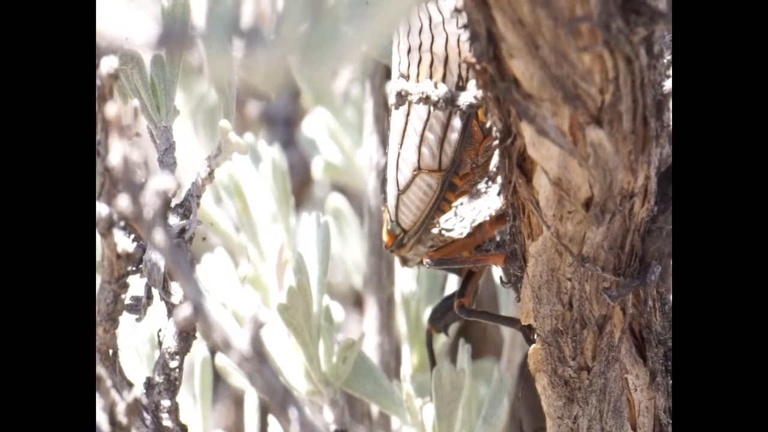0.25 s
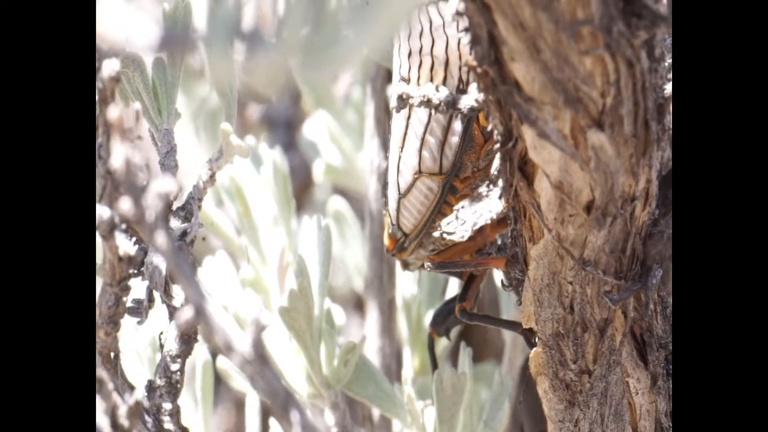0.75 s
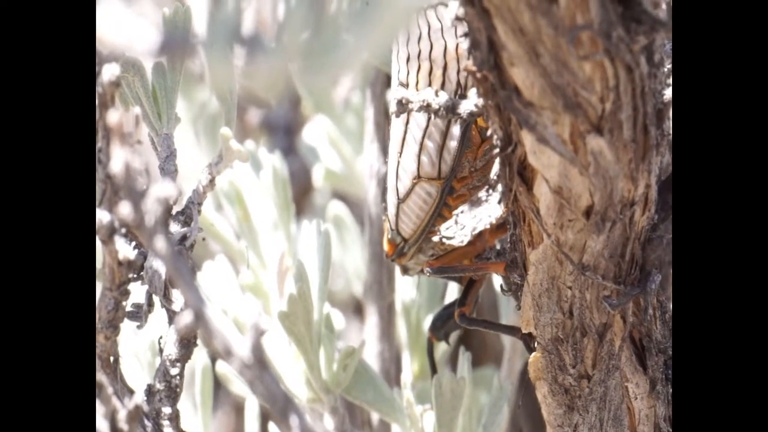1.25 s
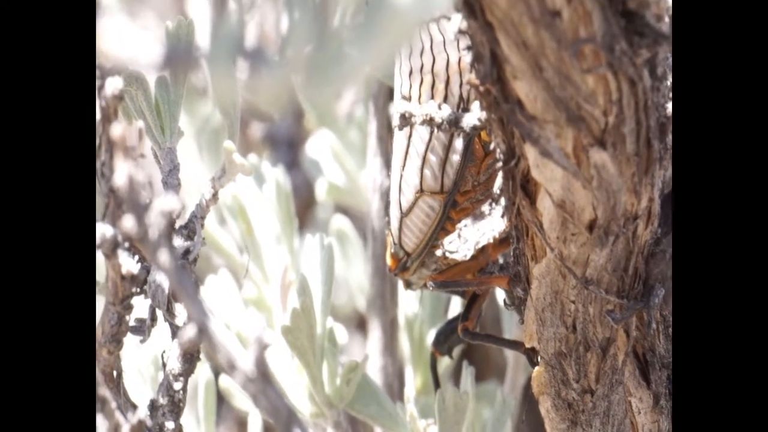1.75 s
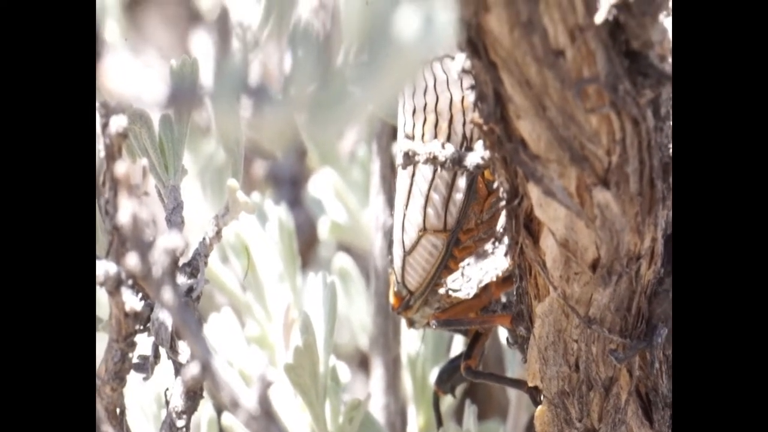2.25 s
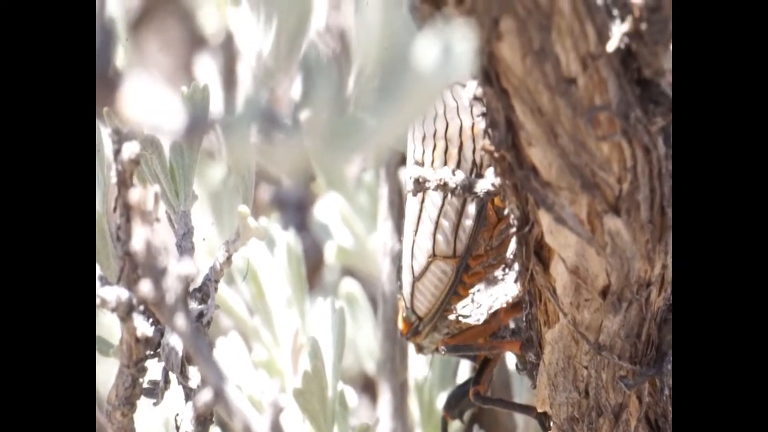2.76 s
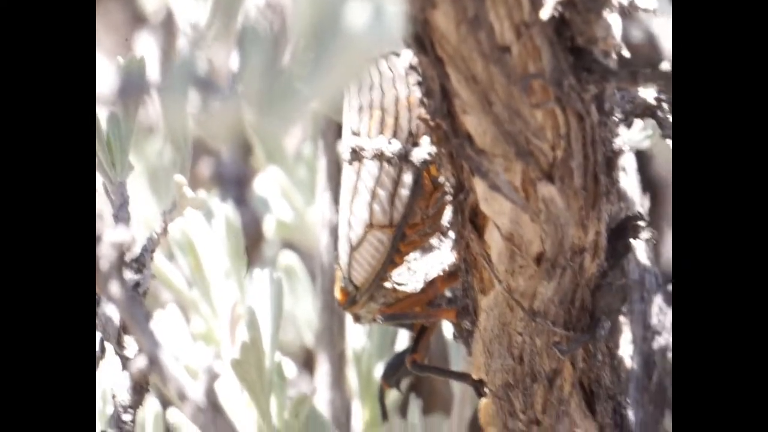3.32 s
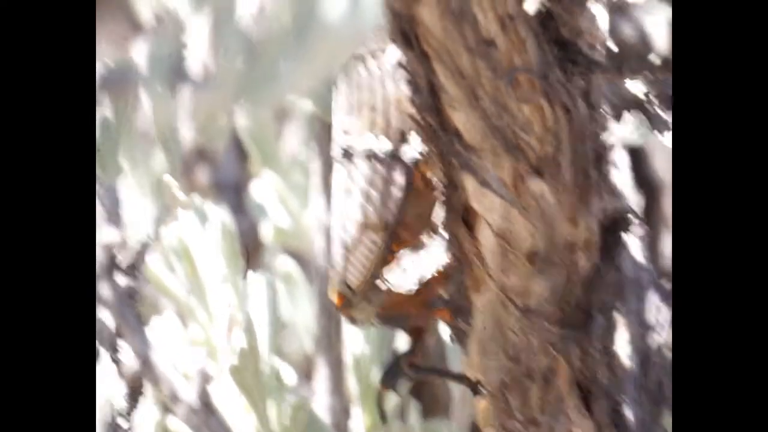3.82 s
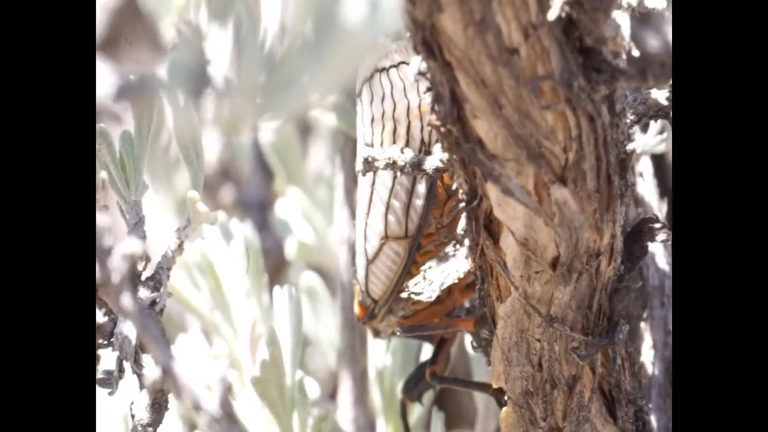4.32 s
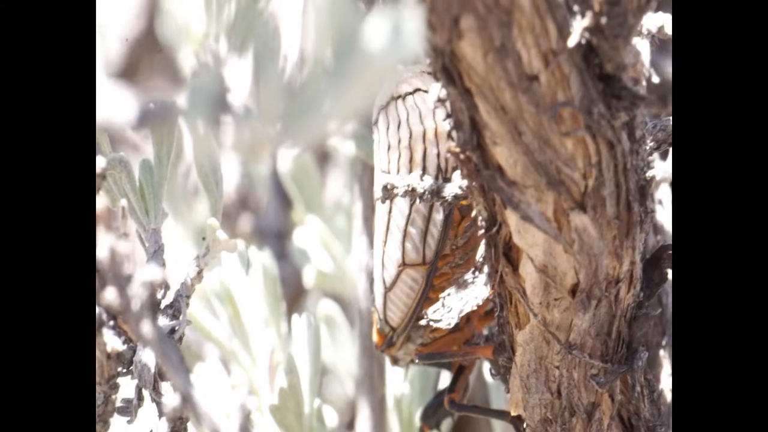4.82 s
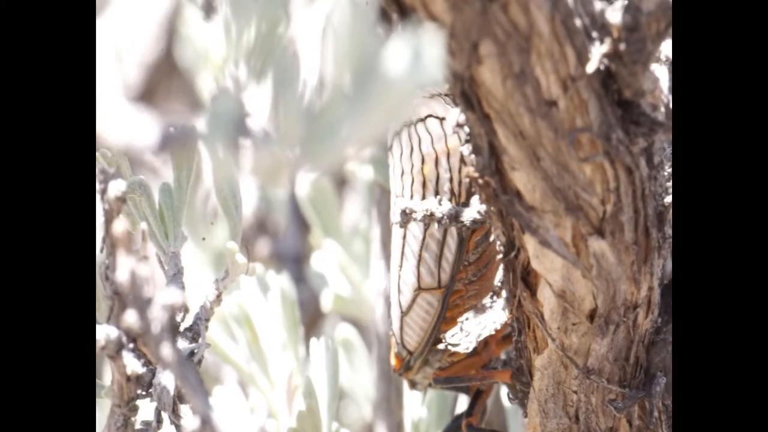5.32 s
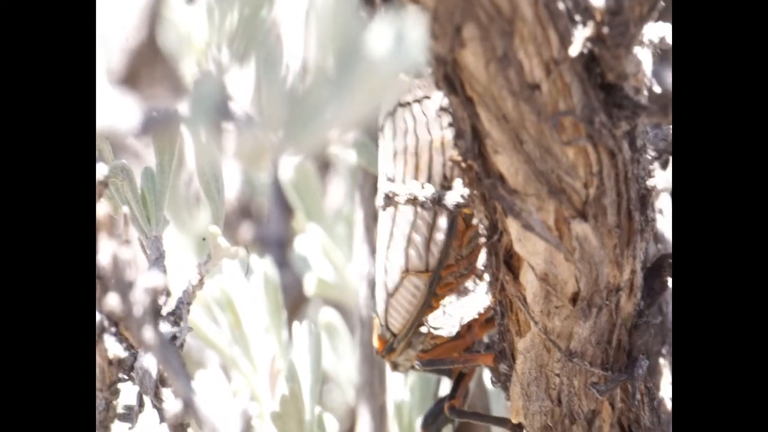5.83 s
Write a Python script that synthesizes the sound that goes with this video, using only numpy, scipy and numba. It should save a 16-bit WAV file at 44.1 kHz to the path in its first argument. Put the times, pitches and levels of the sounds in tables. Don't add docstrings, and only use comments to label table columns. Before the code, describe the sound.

Quiet open scrubland: a faint low hum and thin, high throbbing of distant cicadas. From about 0.76 s, a nearby cicada makes five sharp, dry, irregular ticks. At 0.94 s they turn into regular pulses, about 57 a second, and by 1.2 s a full, harsh, rattling buzz, bright mostly between 4 and 11 kHz, with little bass. Each pulse is a tiny cluster of clicks, close and dry, with a brief hissy scatter. Soft wind bumps arrive at 1.25 to 1.5 s. The buzz stays steady, thickening slightly around 2 s. Stronger low gusts thump the microphone from 3 to 3.75 s, and a tiny twig rustle passes at 4.13 s. From 4.75 s the song swells, denser and brighter, loudest from 5.05 s, then stops dead at about 5.64 s. The background, pushed down by automatic gain, slowly creeps back with faint far cicadas and a light wind bump near 6 s.

```python
import sys
import numpy as np
from scipy import signal
from scipy.fft import rfft, irfft
from scipy.io import wavfile
from scipy.ndimage import uniform_filter1d
from numba import njit

SR = 44100
rng = np.random.default_rng(int(sys.argv[2]) if len(sys.argv) > 2 else 0)


def master_out(mix):
    frames = np.transpose(np.atleast_2d(mix))
    ceiling = np.clip(frames, -1, 1)
    pcm = np.round(ceiling * 32767).astype(np.int16)
    wavfile.write(sys.argv[1], SR, pcm)


def linear_from_db(decibels):
    return 10 ** (np.asarray(decibels, float) / 20)


N = 267907

# time in seconds, first-rib click in dB, number of ribs buckled,
# belly raised (0 to 1), wing rattle in dB.
SONG = [(.94, -27, 2, .9, -10), (1.07, -26.5, 2, .6, 0), (1.078, -28, 3, .05, -2), (1.2, -25.5, 3, .05, 0),
        (1.69, -25.5, 3, .05, 0), (1.71, -25, 3.5, .04, 0), (1.85, -25, 3.5, .02, 0), (2.0, -24.5, 4, 0, 0),
        (4.72, -24, 4, .04, 0), (4.9, -22, 4.5, .3, -6), (5.05, -21, 5, 1, -24), (5.62, -21, 5, 1, -35)]


def cicada():
    rattle, drums = body_rings()
    shiver = shaped(rattle, [(1200, -49), (1900, -10), (2300, 0.5), (2800, 5.0), (3500, 0.0)])
    drum_colour = [(3000, -39), (4200, -15), (4800, -6.5), (5200, 8), (6300, -1.0), (7000, -4.5),
                   (7400, 1.82), (8900, 1.1), (9150, -1.0), (9700, 2.0)]
    near = shaped(drums, drum_colour) + shiver
    out = near.copy()
    # delay in milliseconds, level in dB.
    bark_echoes = [(1.3, -11), (2.3, -19), (3.7, -25)]
    for delay_ms, echo_db in bark_echoes:
        lag = int(delay_ms * SR / 1000)
        out[:, lag:] += linear_from_db(echo_db) * near[:, :-lag]
    scattered = linear_from_db(-32.5) * near + linear_from_db(-21) * shiver
    tail_t60_s = 0.037
    decay = np.exp(-np.log(1000) * np.arange(4000) / (tail_t60_s * SR))
    tail = rng.standard_normal((2, 4000)) * decay
    return out + signal.fftconvolve(scattered, tail, axes=1)[:, :N]


def body_rings():
    s, db, pitch, rib = clicks()
    belly, rattle_db = curve(SONG, s)[2:]
    rattle_db[s > 5.63] = 6
    pan_db = 1.1 - 3 * belly
    # frequency in Hz, decay time t60 in seconds, level from a buckle in dB, level from
    # a snap-back in dB, change with raised belly in dB, left minus right in dB, left phase lead in radians.
    body_modes = [(2360, 0.0034, -95, -24.5, 1, -15, 0.16), (2980, 0.0029, -25, -15.5, 1.5, 5.5, -2.43),
                  (3530, 0.0053, -25.5, -10, 4, -6, -1.73), (4104, 0.0054, -27, -1, 7.5, 3, -0.093),
                  (4097, 0.0041, -35, -10, -2, -4.5, -0.16), (5117, 0.0075, -15, 3, -13, -4.5, -1.06),
                  (5645, 0.0082, -14, 6, -4, 1, -0.6), (6880, 0.012, -10.5, -61, -9, -7, -1.7),
                  (7653, 0.0097, -3.5, 4, 10, -3.5, 0.61), (8081, 0.015, 0.5, -17, -3.5, -10, 0.23),
                  (8358, 0.0075, 2.5, 6.5, 1, 1.5, -0.59), (9420, 0.0079, 0.5, -18, 3.5, 0.5, -0.56),
                  (10425, 0.0071, -1, 6, -6, -5, -0.65), (10970, 0.0068, -15.5, 3.5, -11, -7, -0.65)]
    hz, t60, buckle_db, back_db, belly_db, mode_pan_db, lead = np.array(body_modes).T[:, :, None]
    chance = rng.standard_normal((5, len(body_modes), len(s)))
    wings = hz < 4700
    middle = (hz > 2700) & (hz < 9000)
    back_db = np.where(middle, np.minimum(back_db, buckle_db - 6), back_db)

    size_db = db + np.where(rib < 0, back_db, buckle_db) + 1.0 * chance[0]
    size_db = size_db + wings * (rattle_db + 1.2 * chance[0])
    size_db = size_db + belly * belly_db
    size_db = size_db - 7 * (rib == 0) * (hz > 9000)

    detune = (.007 + .008 * belly + .03 * wings) * chance[1]
    turn_per_sample = 2j * np.pi * hz * pitch * (1 + detune) / SR
    decay_per_sample = np.log(1000) / (np.minimum(t60, .0045) * SR)
    pole = np.exp(turn_per_sample - decay_per_sample)

    lean_db = (mode_pan_db + pan_db + 0.77 * chance[2]) / 2
    phase = .18 * chance[3]
    split = (lead + .25 * chance[4]) / 2
    left = linear_from_db(size_db + lean_db) * np.exp(1j * (phase + split))
    right = linear_from_db(size_db - lean_db) * np.exp(1j * (phase - split))
    start = np.broadcast_to((s * SR).astype(np.int64), pole.shape)

    def ring_modes(chosen):
        parts = [a[chosen].ravel() for a in (start, pole, left, right)]
        return ring(np.zeros((2, N)), parts[0], parts[1], 0.93, parts[2], parts[3])

    return ring_modes(wings[:, 0]), ring_modes(~wings[:, 0])


def clicks():
    # time in seconds, lateness in milliseconds.
    muscle_slip = [(.941, 0), (.994, 0), (1.14, -4.4), (1.4, -2.2), (1.5, -2.4), (1.77, -5.6), (1.93, -4.1),
                   (2.15, -4), (2.3, -4.5), (2.7, -4.4), (3.15, -3.5), (3.55, -1.1), (4.13, .7), (4.4, .3),
                   (4.74, -2), (5.11, -6.6), (5.42, -8.8), (5.55, -8.6)]
    # time in seconds, peak level in dB.
    lone_ticks = np.array([(0.7647, -21), (0.82, -21.5), (0.855, -23), (0.908, -21), (0.9265, -23.5)])
    rib_db = [0, 0, 0, -1.5, -3]
    rib_pitch = [.99, 1.0, 1.005, .995, .99]

    first_pull_s, pull_hz, pulls = .9414, 56.8, 267
    beat = first_pull_s + np.arange(pulls) / pull_hz
    beat = beat + (curve(muscle_slip, beat)[0] + .17 * rng.standard_normal(pulls)) / 1000
    pull = np.r_[lone_ticks[:, 0], beat]
    first_db, second_db, ribs, next_db, second_ms, later_ms, lag_ms, later_db = effort(pull)
    ribs = np.floor(ribs + .499 * (rng.random(len(pull)) + np.arange(len(pull)) % 2))
    ribs[:len(lone_ticks)] = 1
    first_db[:len(lone_ticks)] = lone_ticks[:, 1] - 3.0

    rows, at_ms = [], np.zeros(len(pull))
    for rib, gap_ms in enumerate([2.95, second_ms, later_ms, later_ms, later_ms]):
        chance = rng.standard_normal((4, len(pull)))
        db = first_db + (rib == 1) * next_db + (rib > 1) * later_db + rib_db[rib]
        db = db - 200 * (rib >= ribs)
        pitch = np.full(len(pull), rib_pitch[rib])
        number = np.full(len(pull), float(rib))
        rows.append((pull + at_ms / 1000, db + 1.0 * chance[0], pitch, number))
        other_ms = at_ms + lag_ms + .15 * chance[1]
        other_db = db + np.minimum(second_db, -3) - 7 * (rib == 0) - 6 * (rib > 1) * (lag_ms < 1)
        rows.append((pull + other_ms / 1000, other_db + 1.5 * chance[2], pitch, number))
        at_ms = at_ms + gap_ms + .13 * chance[3]

    for drum, drum_db in enumerate([-8, -12]):
        chance = rng.standard_normal((2, len(pull)))
        back_ms = 6.1 + 1.6 * ribs + 1.8 * drum - 1.2 * (ribs == 2) + .35 * chance[0]
        back_db = first_db + drum_db + 2 * chance[1]
        rows.append((pull + back_ms / 1000, back_db, np.ones(len(pull)), -np.ones(len(pull))))
    rows = np.hstack([np.array(r) for r in rows])
    return rows[:, rows[1] > -100]


def effort(pull):
    first_db, ribs, belly = curve(SONG, pull)[:3]
    fifth = np.clip(ribs - 4, 0, 1)
    second_drum_db = -7.5 + 3 * belly
    next_db = np.interp(pull, (1.07, 1.14), (2, 9))
    second_gap_ms = 2.9 - .55 * fifth
    later_gap_ms = 2.37 + .13 * fifth
    drum_lag_ms = .67 + .58 * fifth
    later_db = 11.3 - 1.8 * fifth
    return first_db, second_drum_db, ribs, next_db, second_gap_ms, later_gap_ms, drum_lag_ms, later_db


@njit
def ring(out, start, pole, rise, left, right):
    for k in range(len(start)):
        z, soft = 1 + 0j, 1.
        for i in range(start[k], len(out[0])):
            z, soft = z * pole[k], soft * rise
            if abs(z) < .003:
                break
            out[0, i] += (1 - soft) ** 2 * (z * left[k]).imag
            out[1, i] += (1 - soft) ** 2 * (z * right[k]).imag
    return out


def wind(t):
    # time in seconds, peak level in dB, half length in seconds, sharper part in dB.
    gusts = [(1.26, -48, 0.052, -18), (1.352, -40, 0.041, -19), (1.473, -40, 0.049, -27),
             (2.902, -51.5, .04, -39), (3.028, -39.5, 0.026, -12.5), (3.092, -31, .03, -11),
             (3.184, -29, 0.04, -2), (3.249, -34, 0.031, -0.5), (3.304, -28.5, 0.026, -13),
             (3.408, -29, 0.068, -14), (3.525, -25.5, 0.038, -14.5), (3.594, -31, .035, -2),
             (3.649, -26, 0.028, -18), (3.732, -35.5, 0.032, -25), (3.832, -53.5, 0.11, -13),
             (4.19, -64.5, 0.22, -0.5), (4.642, -52, 0.04, -28), (4.733, -42, 0.028, -13),
             (4.812, -44, 0.025, -25), (4.93, -51, 0.095, -21), (5.127, -50, 0.057, -27),
             (5.802, -57, 0.047, -12), (5.982, -47, 0.077, -16.5)]
    swell, hard_swell = 0, 0
    for s, db, half_s, sharp_db in gusts:
        gust = linear_from_db(db) * np.exp(-((t - s) / half_s) ** 2)
        swell = swell + gust
        hard_swell = hard_swell + linear_from_db(sharp_db) * gust
    soft = linear_from_db(-64.5) * duck(t) + swell
    hard = linear_from_db(-63) * duck(t) + hard_swell
    thump = coloured(wide_noise(0.76), [(10, -10), (25, 1.0), (80, 3), (120, -5.5), (200, -68), (400, -55.5)])
    sharp = coloured(wide_noise(0.77), [(70, -11.5), (140, 1), (200, -6.5), (300, -15.5), (500, -35.5), (1000, -56)])
    return linear_from_db(2.0 * walk(13)) * (soft * thump + hard * linear_from_db(2.0 * walk(25)) * sharp)


def rustle(t):
    # time in seconds, level in dB.
    brushes = [(4.119, -45.5), (4.134, -45.5), (4.151, -52)]
    gate = sum(linear_from_db(db) * np.exp(-((t - s) / 0.0054) ** 2) for s, db in brushes)
    return gate * coloured(wide_noise(.3), [(200, -28), (500, -6), (1500, -11.0), (3000, -4), (5000, -6), (9000, -50)])


def chorus(t):
    # time in seconds, level in dB.
    chorus_level = [(0, -46.5), (.7, -49.5), (3, -54.5), (5.7, -40)]
    # frequency in Hz, density in dB per Hz.
    chorus_colour = [(3240, -43), (5500, -38), (5860, -30), (6510, -29), (7030, -19.5), (7510, -14),
                     (8900, -6), (10200, -9.5), (11000, -18), (11100, -55), (22000, -120)]
    out = linear_from_db(7) * wide_noise(-0.029)
    for pull_hz, db in [(51.5, 7.0), (58.0, 0.0), (57.0, -12)]:
        phase = 2 * np.pi * pull_hz * t + 1.0 * walk(0.95) + 2 * np.pi * rng.random()
        throb = np.exp(1.2 * np.cos(phase))
        ribs = 1 + .6 * np.cos(6 * phase)
        out = out + linear_from_db(db + 2.0 * walk(5.52)) * throb * ribs / 2 * wide_noise(-0.014)
    return linear_from_db(curve(chorus_level, t)[0]) * coloured(out, chorus_colour)


def air():
    # frequency in Hz, density in dB per Hz.
    hum_colour = [(24, -14), (40, -27), (65, -26.5), (97, 7.5), (119, -13.5), (144, -1.5), (400, -15.5),
                  (520, -28), (880, -120)]
    bass = coloured(wide_noise(1.0), hum_colour[:6] + [(200, -48), (300, -28)])
    out = linear_from_db(-9.0 + 2.4 * walk(16.0)) * bass
    bands = [(200, -11.5), (330, -10.5), (550, -12.5), (900, -13.5), (1500, -15.5), (2400, -18.0),
             (3800, -18.5), (6000, -19)]
    for hz, db in bands:
        band = coloured(wide_noise(-.3), [(hz / 2.2, -40), (hz / 1.25, 0), (hz * 1.25, 0), (hz * 2.2, -40)])
        out = out + linear_from_db(db + 1.86 * walk(7.3) + 0.55 * walk(18)) * band
    return linear_from_db(-54) * out


def duck(t):
    from_s, to_s, attack_s, release_s = 4.83, 5.56, 0.33, 0.89
    sunk = 1 - np.exp(-np.clip(np.minimum(t, to_s) - from_s, 0, None) / attack_s)
    recovery = np.exp(-np.clip(t - to_s, 0, None) / release_s)
    return linear_from_db(-14 * sunk * recovery)


def wide_noise(alike):
    mid, side = rng.standard_normal((2, N))
    alike = np.clip(alike, -1, 1)
    return np.sqrt(1 + alike) * mid + np.sqrt(1 - alike) * side * np.array([[1], [-1]])


def walk(rate_hz):
    k = int(SR / rate_hz)
    held = np.repeat(rng.standard_normal(N // k + 1), k)
    return unit(uniform_filter1d(uniform_filter1d(held, k), k)[:N])


def coloured(x, points):
    return unit(shaped(x, points))


def shaped(x, points):
    hz, db = np.transpose(points)
    f = np.log(np.fft.rfftfreq(x.shape[-1], 1 / SR) + 1)
    return irfft(rfft(x) * linear_from_db(np.interp(f, np.log(hz), db)), x.shape[-1])


def unit(x):
    return x / np.sqrt(np.mean(x ** 2))


def curve(table, s):
    table = np.array(table, float)
    return [np.interp(s, table[:, 0], c) for c in table.T[1:]]


def scene():
    t = np.arange(N) / SR
    return cicada() + wind(t) + rustle(t) + duck(t) * (chorus(t) + air())


def roll_off(x):
    return signal.sosfilt(signal.butter(12, 12370, fs=SR, output="sos"), x)


def record(dry):
    # frequency in Hz, gain in dB.
    sampling_edge = [(10950, 0.5), (11020, -1), (11040, -2.5), (11500, -18), (12300, -50), (13000, -70)]
    return roll_off(shaped(dry, sampling_edge))


dry = scene()
out = record(dry)
master_out(out)
```